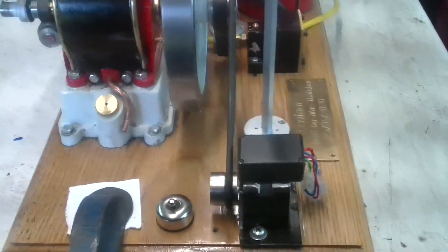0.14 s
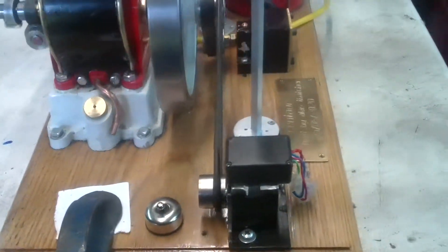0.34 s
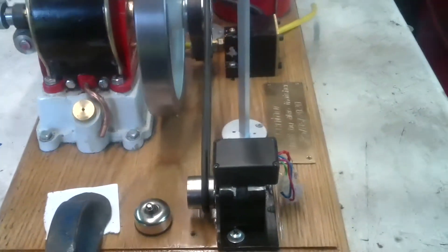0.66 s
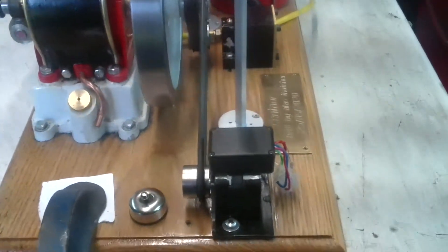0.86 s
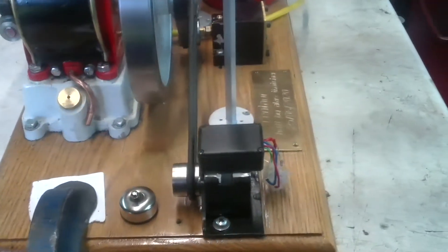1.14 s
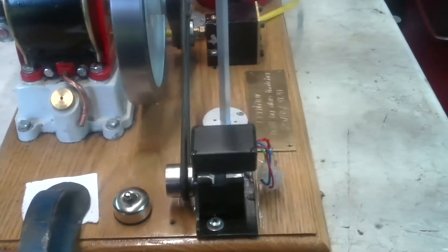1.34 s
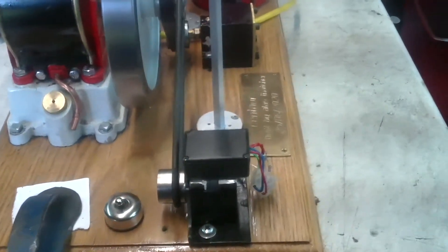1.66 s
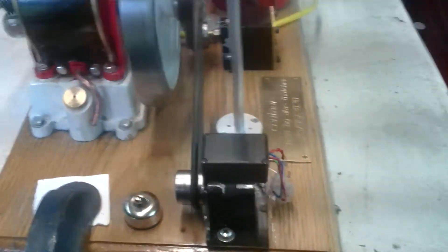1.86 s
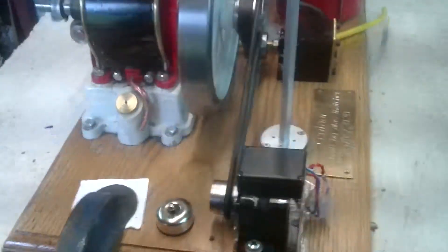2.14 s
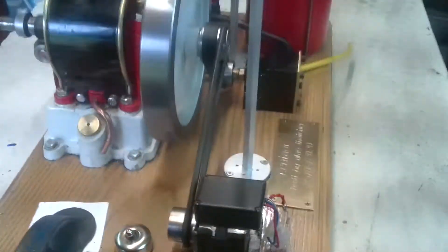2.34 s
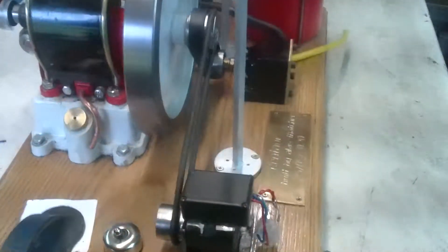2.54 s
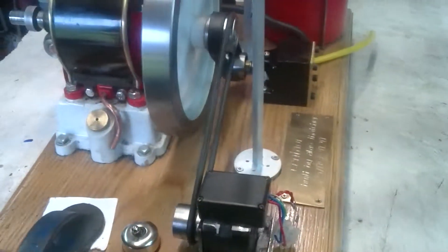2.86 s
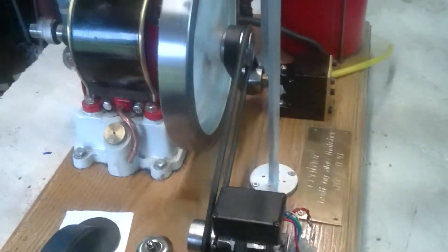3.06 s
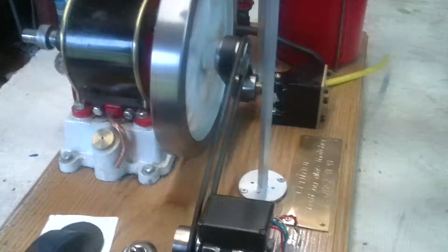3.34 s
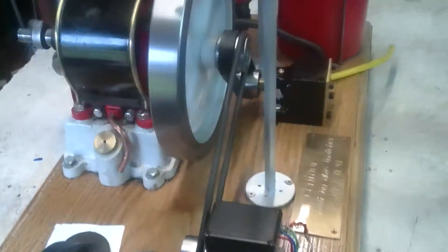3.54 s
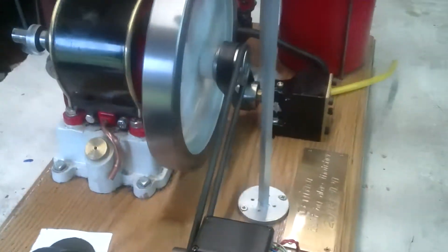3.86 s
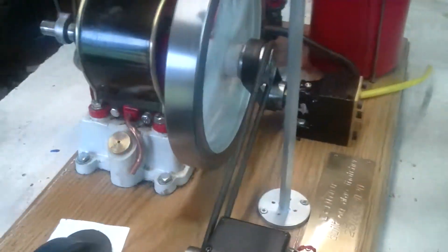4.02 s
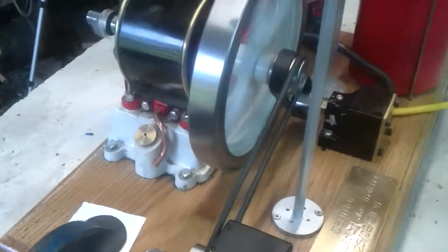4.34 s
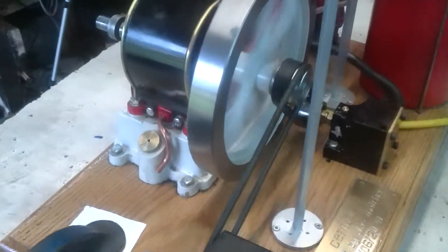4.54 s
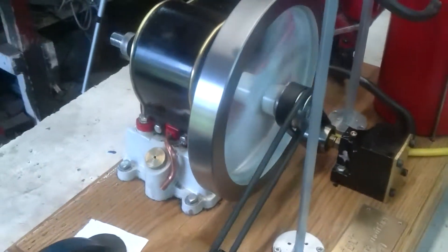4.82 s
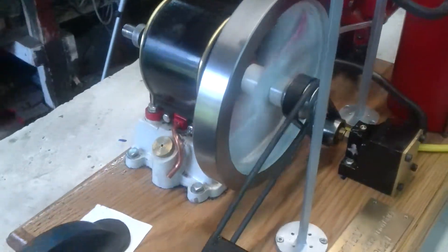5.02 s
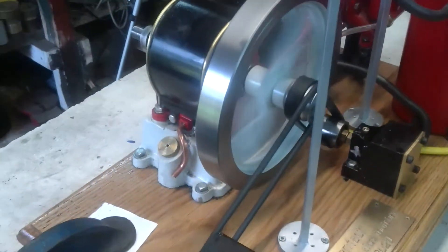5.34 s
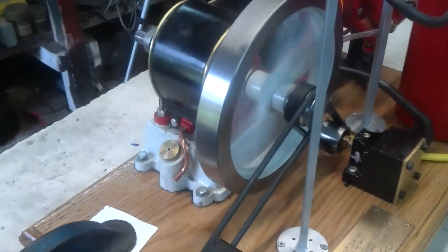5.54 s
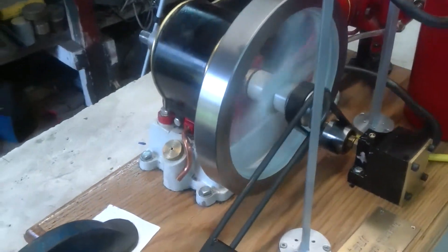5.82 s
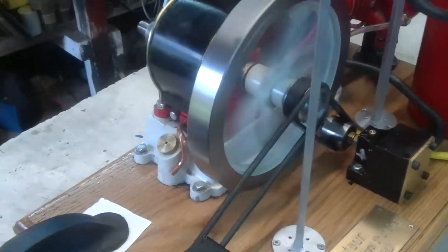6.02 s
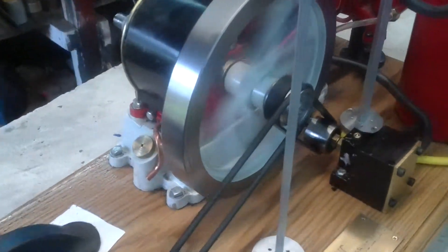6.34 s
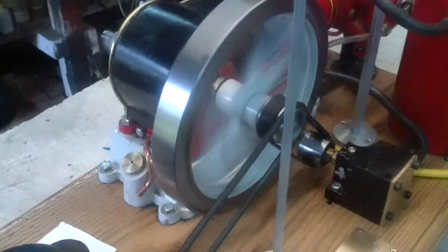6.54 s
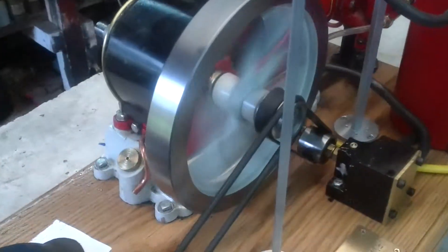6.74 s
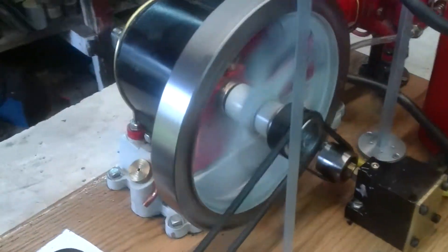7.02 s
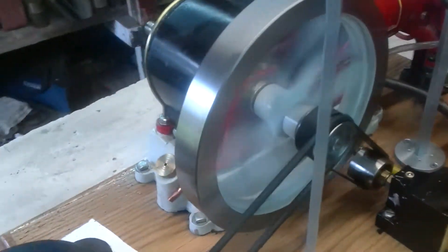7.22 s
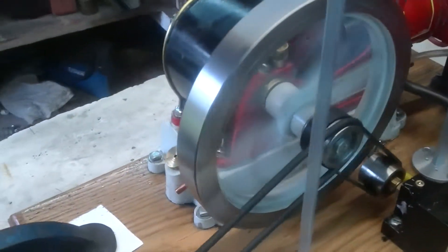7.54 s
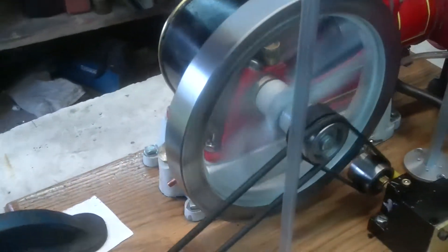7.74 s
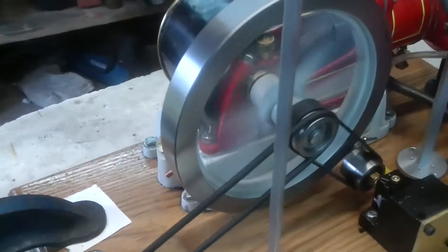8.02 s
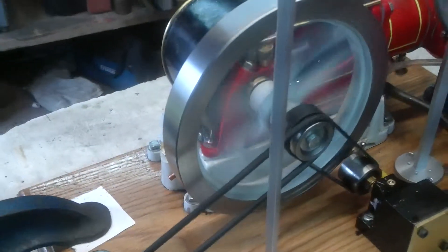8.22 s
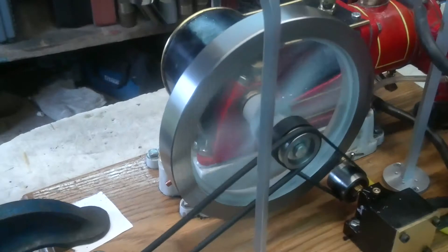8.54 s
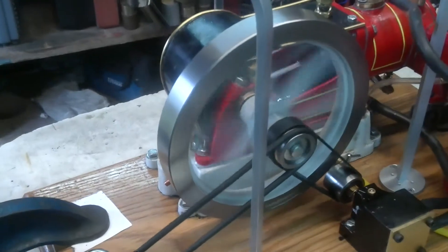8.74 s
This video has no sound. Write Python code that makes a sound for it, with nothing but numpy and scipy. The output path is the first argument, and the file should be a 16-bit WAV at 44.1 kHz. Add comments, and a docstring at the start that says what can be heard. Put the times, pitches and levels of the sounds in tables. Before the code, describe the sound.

Already running, a small model engine keeps up a fast, even beat of bright exhaust spits and clattering valve gear over a faint flywheel whirr. It skips firings often at first, fires steadily for a moment, then skips again, with the mechanical ticking never stopping. A light crank knock and low boom strengthen a little toward the end. The microphone is close, in a workshop with short echoes.

```python
"""A small four-stroke model engine is already running on a wooden base in a workshop, 8.4 cycles a second.
Most cycles fire: hot gas spits from a short exhaust pipe, then the cylinder booms with a rising note.
The valve gear clatters, the crank knocks and the room rings briefly. A cycle that misses has no spit or
boom. Misses are common in the first 3 s, stop for a while and return from 4.5 s on.
Towards the end, near 9 s, the boom and the knock are a little louder."""
import sys
import numpy as np
from scipy import signal
from scipy.fft import rfft, irfft
from scipy.io import wavfile
from scipy.ndimage import uniform_filter1d

SR = 44100
rng = np.random.default_rng(int(sys.argv[2]) if len(sys.argv) > 2 else 0)


def master_out(mix):
    """Clip the mix to full scale and print it as 16-bit PCM to the path in sys.argv[1]."""
    frames = np.transpose(np.atleast_2d(mix))
    ceiling = np.clip(frames, -1, 1)
    pcm = np.round(ceiling * 32767).astype(np.int16)
    wavfile.write(sys.argv[1], SR, pcm)


N = 391608
LEAD = SR // 10  # extra samples before the start, so the engine is already running
SIZE = N + LEAD

# how long the workshop rings: f/Hz, time to fade by 60 dB/s
ROOM_FADE = [(150, 0.41), (300, 0.24), (1000, 0.23), (4000, 0.18), (9000, 0.2), (15000, 0.15)]
# standing waves between bench and walls: f/Hz, width/Hz, level/dB
STANDING_WAVES = [(227.8, 5.6, 3.5), (284, 14.6, -1), (442, 9.4, -5.5), (521, 7.4, -14), (696, 30, -8.5)]
# the listener swings round towards the cylinder head: t/s, level/dB
FACING_LEVEL = [(0, -2.5), (2, -1.5), (4.501, -1.5), (6, -0.5), (7, -0.5), (8.8, -1)]
# tone colour of bearings, belt and flywheel: f/Hz, level/dB
WHIRR_COLOUR = [(25, -39), (70, -38), (150, -28), (270, 5.5), (400, -4.5), (720, -1.5), (1200, 2.5),
                (1600, -6), (2200, -2.5), (3000, -17), (4500, -11.5), (8000, -16.5), (13000, -32),
                (16000, -37)]
# crank speed, two turns to a cycle: t/s, speed/rpm
CRANK_SPEED = [(0, 985), (.79, 1016), (.9, 942), (1.58, 1026), (1.88, 1001), (2.41, 1034), (3.6, 976),
               (3.64, 1026), (4.06, 963), (4.53, 1063), (4.77, 964), (5.45, 1081), (5.99, 1056),
               (6.22, 982), (6.66, 1038), (6.9, 971), (7.1, 1023), (7.91, 996), (7.93, 1029), (8.8, 1026)]
# strength of the crank's knock: t/s, level/dB
KNOCK_LEVEL = [(0, -33), (2.9, -32), (4.4, -30), (5.8, -31.5), (7.1, -28), (8.8, -28)]
# gas pushed past the valve by the piston: t/s from the knock, hiss level/dB, pipe level/dB
PISTON_GAS = [(-.06, -47, -56), (-.05, -44, -41), (-.036, -49, -48.5), (-.022, -40, -47),
              (-.008, -38.5, -74), (.002, -42, -61), (.02, -41, -69), (.05, -92, -68)]
# tone colour of steel striking steel: f/Hz, level/dB
STEEL_COLOUR = [(100, -27.5), (400, 7.5), (900, 2), (1500, 5.5), (2800, 5), (5500, 0), (8000, 1),
                (13000, 3.5), (14500, -4), (16000, -35)]
# ringing springs, rods and flywheel rim: f/Hz, width/Hz, level/dB
METAL_NOTES = [(1066, 34, 7), (2340, 72, -3), (3660, 104, 2.5), (5060, 230, 1), (5540, 260, -6),
               (6360, 220, 1.5), (8370, 13, 11), (14400, 300, 4)]
# notes of the engine bed and its wooden base: f/Hz, level/dB, time to fade by 60 dB/s
BASE_NOTES = [(317.6, -7, 0.049), (445, -11, 0.018), (705, -3, 0.032), (832, -3, 0.027), (1020, -5, 0.019),
              (1270, -8, 0.021)]
# blows of the valve gear in each cycle: t/s from the knock, click level/dB, decay/s,
# level/dB into the base, timing scatter/s, f/Hz of the struck part, its level/dB
GEAR_BLOWS = [(-.039, -36, 0.0018, -42, .0006, 6000, -37.5),
              (-.0272, -29, 0.0056, -30, 0.00051, 11100, -34),
              (-.0235, -30.5, 0.0035, -26, .0009, 3750, -38), (-.0015, -30, .0017, -76, .0006, 14400, -38),
              (.0335, -45, .0028, -37, 0.0011, 1200, -42.5),
              (0.0376, -62, .0023, -40.5, 0.00111, 1100, -47)]
# cycles that do not fire: cycle number
MISSED_CYCLES = [1, 3, 10, 12, 14, 16, 18, 20, 24, 38, 42, 44, 46, 48, 52, 54, 56, 60, 62, 68, 70]
# firings that burn poorly: cycle number, change of level/dB
POOR_BURNS = {5: -4.5, 8: -4, 22: -2.5, 36: -13.5, 50: -11, 66: -14, 72: -3, 74: -5.5}
# strength of an ordinary firing: t/s, gas level/dB, boom level/dB
FIRING_LEVEL = [(0, -20.5, -40.5), (2.5, -21, -41.5), (3, -20, -38), (4.5, -19.5, -38), (5.6, -21.5, -38.5),
                (6.4, -21, -37), (6.9, -19.5, -38), (7.7, -18, -36), (8.8, -19.5, -35)]
# tone colour of escaping gas: f/Hz, level/dB
GAS_COLOUR = [(30, -33), (130, -13), (280, 3), (500, -6), (850, 5), (1400, -14), (2300, -4.5), (3100, -5),
              (5000, 0), (7500, -1.5), (11000, -1), (14000, 1), (16000, -1)]
# note of the exhaust pipe: t/s, f/Hz
PIPE_PITCH = [(0, 4245), (3.7, 4325), (6, 4144), (8.8, 4130)]
# overtones of the pipe: multiple of its note, width/Hz, level/dB relative to its hiss
PIPE_OVERTONES = [(2.09, 890, -11.5), (3.08, 1140, -4.5), (3.33, 1500, -4.5)]
# echoes off hard faces near the exhaust: delay/s at the start, delay/s at the end, level/dB
NEAR_ECHOES = [(.0009, 0.00141, -14.5), (.0026, .0019, -12.5)]


def gain_of(db):
    """Turns decibels into a factor to multiply by."""
    return 10 ** (np.asarray(db) / 20)


def unit_rms(x):
    """Scales a signal to an average strength (rms) of 1."""
    return x / np.sqrt(np.mean(x ** 2) + 1e-20)


def at_frequency(points, hz):
    """Reads a table at hz, on a log-frequency axis."""
    f, value = np.transpose(points)
    return np.interp(np.log(hz + 1), np.log(f + 1), value)


def at_time(points, s):
    """Reads every column of a table at time s."""
    times, *columns = np.transpose(points)
    return [np.interp(s, times, column) for column in columns]


def add(mix, s, sound):
    """Mixes in a sound that starts at time s."""
    part = mix[max(0, round(s * SR) + LEAD):][:len(sound)]
    part += sound[:len(part)]


def coloured(x, colour, size=2048):
    """Gives a sound a tone colour; white noise keeps its power."""
    hz = abs(np.fft.fftfreq(size, 1 / SR))
    log_gain = np.log(unit_rms(gain_of(at_frequency(colour, hz))))
    taps = np.fft.ifft(np.exp(np.conj(signal.hilbert(log_gain)))).real  # rings only after a click
    return signal.oaconvolve(x, taps)[:len(x)]


def resonate(x, hz, width):
    """Makes a sound ring around a steady or gliding pitch; white noise keeps its power."""
    turn = np.exp(2j * np.pi * np.cumsum(np.full(len(x), hz)) / SR)
    r = np.exp(-np.pi * width / SR)
    pole = [1 - r], [1, -r]
    smoothed = signal.lfilter(*pole, signal.lfilter(*pole, x / turn))
    return (turn * smoothed).real * np.sqrt(8 / (1 - r))


def ringing(x, notes):
    """The narrow notes that a sound sets ringing."""
    return sum(gain_of(db) * signal.lfilter(*signal.iirpeak(hz, hz / width, SR), x)
               for hz, width, db in notes)


def facing():
    """The changing gain of the parts that face the listener."""
    return gain_of(at_time(FACING_LEVEL, (np.arange(SIZE) - LEAD) / SR)[0])


def crank_times(share, first_s=-.0298):
    """The times at which each cycle has run the given share of its course."""
    t = np.arange(first_s, N / SR, 1 / SR)
    cycles_done = np.cumsum(at_time(CRANK_SPEED, t)[0]) / (2 * 60 * SR)
    return np.interp(np.arange(share, cycles_done[-1]), cycles_done, t)


def all_cycles(knock_share=.4364, scatter_db=0.4, snap_s=.0087, s_per_rpm=.00003, scatter_s=.0009):
    """One row per cycle, fired or not: knock t/s, knock level/dB, delay/s until the valve shuts."""
    s = crank_times(knock_share)
    (rpm,), (db,) = at_time(CRANK_SPEED, s), at_time(KNOCK_LEVEL, s)
    luck = rng.standard_normal((len(s), 2)).T
    lag = snap_s + s_per_rpm * (rpm - rpm.mean()) + scatter_s * luck[1]  # thrown faster, it shuts later
    return np.transpose([s, db + scatter_db * luck[0], lag])


def fired_cycles(flush_db=1.54, scatter_db=0.49, pipe_db=-4, pipe_scatter_db=0.94, pitch_scatter=.03):
    """One row per firing: peak flow t/s, gas level/dB, pipe f/Hz, pipe level/dB, boom level/dB."""
    s = crank_times(0)
    fires = ~np.isin(np.arange(len(s)), MISSED_CYCLES)
    burn_db = np.array([POOR_BURNS.get(cycle, 0) for cycle in range(len(s))])
    # a miss or a very poor burn flushes the cylinder, so the next firing is stronger
    flushed = np.r_[False, (~fires | (burn_db < -6))[:-1]]
    (gas_db, boom_db), (hz,) = at_time(FIRING_LEVEL, s), at_time(PIPE_PITCH, s)
    luck = rng.standard_normal((len(s), 3)).T
    force_db = burn_db + flush_db * flushed + scatter_db * luck[0]
    ring_db = gas_db + pipe_db + 0.94 * force_db + pipe_scatter_db * luck[1]
    pitch = hz * (1 + pitch_scatter * luck[2])
    return np.transpose([s, gas_db + force_db, pitch, ring_db, boom_db + 0.53 * burn_db])[fires]


def workshop(x, first_s=0.00505, bass_db=-5, treble_db=-6.0, drift_hz=0.364):
    """Dense echoes, each band fading at its own speed; their pattern drifts as the listener moves."""
    out, clock, n = np.zeros(SIZE), np.arange(SIZE) / SR, SR // 3
    for third in np.arange(3) / 3:  # three echo patterns fade in and out in turn
        echoes = rng.standard_normal(n) * (rng.random(n) < .15) * (np.arange(n) > first_s * SR)
        hz, t, bands = signal.stft(echoes, SR, nperseg=256)
        fade = gain_of(-60 * t / at_frequency(ROOM_FADE, hz)[:, None])
        tail = signal.istft(bands * fade, SR, nperseg=256)[1]
        tilt_db = at_frequency([(700, bass_db), (3000, treble_db)], np.fft.rfftfreq(len(tail), 1 / SR))
        tail = irfft(rfft(tail / np.linalg.norm(tail)) * gain_of(tilt_db))[:SR // 4]
        share = np.sqrt(2 / 3) * np.cos(np.pi * (drift_hz * clock + third))
        out += signal.oaconvolve(x * share, tail)[:SIZE]
    return out


def whirr(level_db=-42.5):
    """Bearings, belt and flywheel rub steadily as they turn."""
    return gain_of(level_db) * coloured(rng.standard_normal(SIZE), WHIRR_COLOUR)


def valve_thump(cycles, hz=240, early_s=.057, length_s=0.013, level_db=-44):
    """A soft low thump each time the exhaust valve cracks open."""
    out, t = np.zeros(SIZE), np.arange(round(length_s * SR)) / SR
    swell = np.sin(np.pi * t / length_s) ** 2
    for s, *_ in cycles:
        note = np.sqrt(2) * np.sin(2 * np.pi * (hz * rng.uniform(0.78, 1.145) * t + rng.random()))
        add(out, s - early_s, gain_of(level_db) * note * swell)
    return out


def piston_hiss(cycles, pipe_hz=4300, width_hz=950):
    """The piston pushes gas past the valve and through the pipe in every cycle, fired or not."""
    hiss, pipe = np.zeros((2, SIZE))
    t = np.arange(PISTON_GAS[0][0], PISTON_GAS[-1][0], 1 / SR)
    hiss_shape, pipe_shape = gain_of(at_time(PISTON_GAS, t))
    for s, *_ in cycles:
        add(hiss, s + t[0], hiss_shape * rng.standard_normal(len(t)))
        add(pipe, s + t[0], pipe_shape * rng.standard_normal(len(t)))
    return coloured(hiss, GAS_COLOUR) + resonate(pipe, pipe_hz, width_hz)


def click(db, decay_s, spread_db=2.6):
    """Steel meets steel in a brief crackle, never twice equally hard."""
    t = np.arange(SR // 50) / SR
    strength = gain_of(db + spread_db * rng.standard_normal())
    return strength * np.exp(-t / decay_s) * rng.standard_normal(len(t))


def clatter(steel, click_db=-3, ring_db=-1):
    """The bare clicks and the metal that they set ringing."""
    clicks = coloured(steel, STEEL_COLOUR)
    return gain_of(click_db) * clicks + gain_of(ring_db) * ringing(clicks, METAL_NOTES)


def wooden_base(blows, contact_s=0.00027):
    """Each blow makes the base ring with a few short notes."""
    t = np.arange(SR // 8) / SR
    ring = sum(gain_of(db - 60 * t / fade_s) * np.sin(2 * np.pi * hz * t)
               for hz, db, fade_s in BASE_NOTES)
    return signal.oaconvolve(blows, ring * (1 - np.exp(-t / contact_s)))[:SIZE]


def valve_gear(cycles, firings, snap_db=-24.5, snap_decay_s=0.0023, bounce_s=.0034, bounce_db=-31,
               seat_db=-37, push_db=-13, push_early_s=0.006115):
    """Cam, rocker and valve strike in the same order each cycle: the steel clicks and the base rings."""
    steel, blows, parts = np.zeros((3, SIZE))
    for s, _, lag in cycles:
        for offset, steel_db, decay_s, base_db, scatter, part_hz, part_db in GEAR_BLOWS:
            at = s + offset + scatter * rng.standard_normal()
            add(steel, at, click(steel_db, decay_s))
            add(parts, at, resonate(click(part_db, decay_s), part_hz, width=0.17 * part_hz))
            add(blows, at, gain_of([base_db + 2 * rng.standard_normal()]))
        # the valve snaps onto its seat and bounces once
        shut = s + lag - .0007
        add(steel, shut, click(snap_db, snap_decay_s))
        add(steel, shut + bounce_s * rng.uniform(.7, 1.3), click(bounce_db, snap_decay_s))
        add(blows, shut, gain_of([seat_db]))
    for s, gas_db, *_ in firings:  # the rocker forces the valve open against the pressure
        add(blows, s - push_early_s, gain_of([gas_db + push_db]))
    bass_cut = signal.butter(4, 170, "highpass", fs=SR, output="sos")  # a small board gives no deep bass
    return facing() * signal.sosfilt(bass_cut, clatter(steel) + parts + wooden_base(blows))


def crank_knock(cycles, hz=745, early_s=0.003, rise_s=0.0022, boost_db=8, echo_s=0.00423, echo_db=-12):
    """Slack in the crank is taken up once a cycle: a short hollow knock, thrown back by the bench."""
    out, t = np.zeros(SIZE), np.arange(SR // 50) / SR
    shape = (t / rise_s * np.exp(1 - t / rise_s)) ** 2
    for s, db, _ in cycles:
        note = np.cos(2 * np.pi * hz * rng.uniform(1.0, 1.03) * (t - early_s))
        knock = gain_of(db + boost_db) * shape * note
        add(out, s - early_s, knock)
        add(out, s - early_s + echo_s, gain_of(echo_db) * knock)
    return out


def cylinder_boom(firings, low_hz=115, high_hz=320, glide_s=0.0227, length_s=0.052, early_s=0.003,
                  roughness=0.33, puff_db=-6, puff_s=0.00063):
    """The open cylinder is like a bottle that shrinks as the piston comes up, so its note rises."""
    out, t = np.zeros(SIZE), np.arange(round(length_s * SR)) / SR
    hz = high_hz + (low_hz - high_hz) * np.exp(-t / glide_s)
    swell = np.sin(np.pi * t / length_s)
    puff = gain_of(puff_db) * (1 - t / puff_s) * np.exp(-t / puff_s)  # the slug of gas itself
    for s, *_, db in firings:
        note = np.sqrt(2) * np.sin(2 * np.pi * np.cumsum(hz * rng.uniform(0.97, 1.005)) / SR)
        note += roughness * resonate(rng.standard_normal(len(t)), hz, width=125)
        add(out, s - early_s, gain_of(db) * (swell * note + puff))
    return out


def with_near_echoes(x):
    """The exhaust's treble glances off base and flywheel; the paths change as the listener moves."""
    n = np.arange(SIZE)
    echoes = sum(gain_of(db) * np.interp(n - np.linspace(start, end, SIZE) * SR, n, x)
                 for start, end, db in NEAR_ECHOES)
    return x + signal.sosfilt(signal.butter(1, 2500, "highpass", fs=SR, output="sos"), echoes)


def port_bark(jet, hz=2220, width_hz=950, level_db=-12):
    """The exhaust port rings with a hollow bark, beamed along the cylinder."""
    return gain_of(level_db) * facing() ** 2 * resonate(jet, hz, width_hz)


def exhaust(firings, rise_s=0.0037, fall_s=0.0039, glide=0.055, glide_s=0.0069, width_hz=780,
            hiss_db=-1.0, roar_db=-2, sputter=0.11):
    """A sputtering jet swells as the valve lifts; the pipe rings higher as it fills with hot gas."""
    jet, pipe = np.zeros((2, SIZE))
    t = np.arange(-SR // 100, SR // 40) / SR  # zero at the peak of the flow
    lift = np.exp(np.minimum(t / rise_s, -t / fall_s)) * np.clip((t + 0.0071) / 0.0027, 0, 1)
    noise = lambda: rng.standard_normal(len(t))
    unit_burst = lambda x: x / np.sqrt(np.mean(x[abs(t) < .0045] ** 2))  # rms 1 around the peak
    for s, gas_db, hz, pipe_db, _ in firings:
        flow = lift * np.exp(sputter * unit_rms(uniform_filter1d(noise(), size=44)))
        pitch = hz * (1 + glide * np.tanh(t / glide_s))
        blown = lambda multiple, width: unit_burst(flow * resonate(noise(), multiple * pitch, width))
        overtones = sum(gain_of(db) * blown(multiple, width) for multiple, width, db in PIPE_OVERTONES)
        add(pipe, s + t[0], gain_of(pipe_db) * blown(1, width_hz) + gain_of(gas_db + hiss_db) * overtones)
        add(jet, s + t[0], gain_of(gas_db + roar_db) * unit_burst(flow * noise()))
    return with_near_echoes(pipe), with_near_echoes(coloured(jet, GAS_COLOUR) + port_bark(jet))


def scene(knock_room_db=-6, pipe_room_db=-2.0, jet_room_db=1.5):
    """The engine close by; the room scatters its clatter and answers the bass with its own notes."""
    cycles, firings = all_cycles(), fired_cycles()
    pipe, jet = exhaust(firings)
    works = piston_hiss(cycles) + valve_gear(cycles, firings)
    knock = crank_knock(cycles)
    engine = pipe + jet + works + knock + cylinder_boom(firings) + valve_thump(cycles)
    # the pipe beams its ring forwards, while the jet sprays sound all round
    exhaust_to_room = gain_of(pipe_room_db) * pipe + gain_of(jet_room_db) * jet
    room = workshop(works + exhaust_to_room + gain_of(knock_room_db) * knock)
    return (engine + room + ringing(engine, STANDING_WAVES) + whirr())[None, LEAD:]


def record(dry, edge_hz=15800):
    """Cuts away the very highest treble."""
    treble_cut = signal.firwin(301, edge_hz, window=("kaiser", 8), fs=SR)
    return signal.oaconvolve(dry, treble_cut[None], "same")


dry = scene()
out = record(dry)
master_out(out)
```